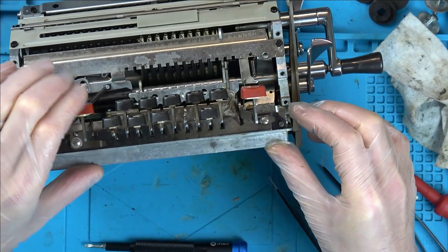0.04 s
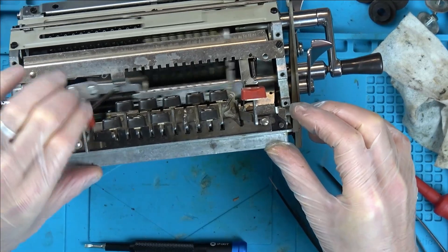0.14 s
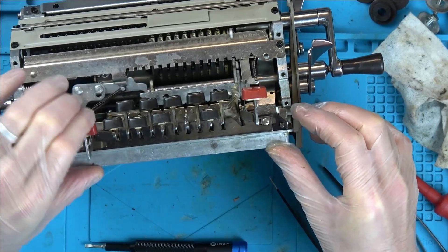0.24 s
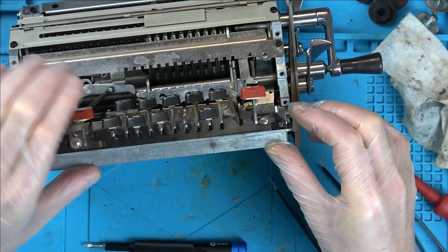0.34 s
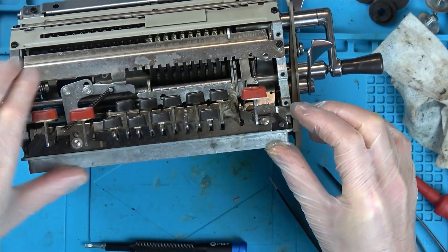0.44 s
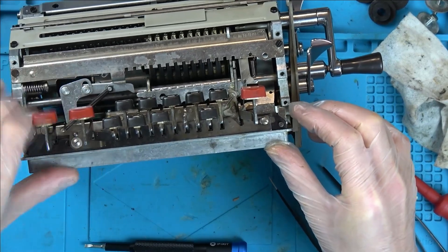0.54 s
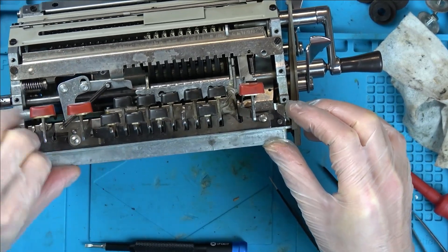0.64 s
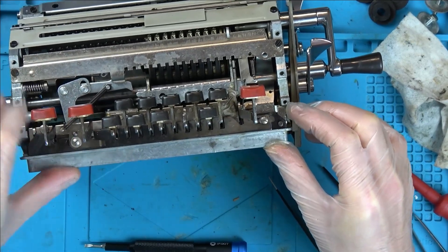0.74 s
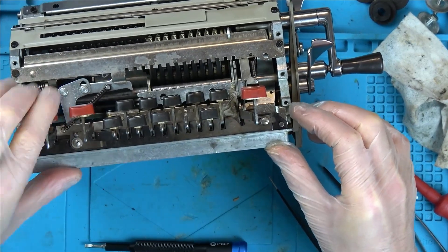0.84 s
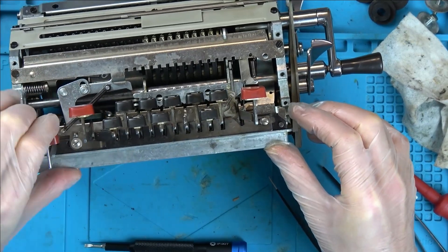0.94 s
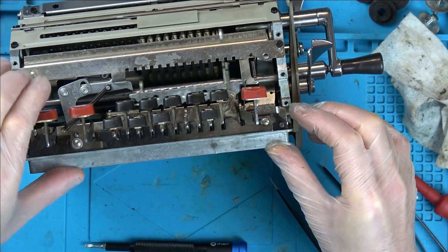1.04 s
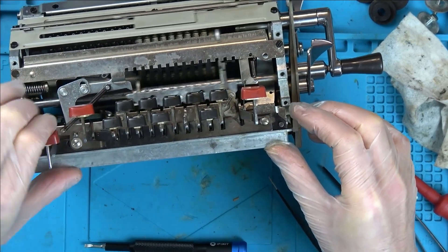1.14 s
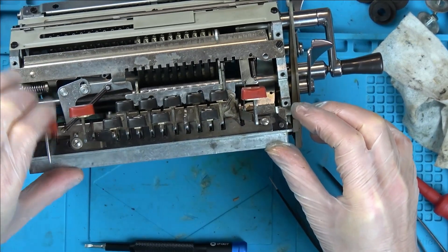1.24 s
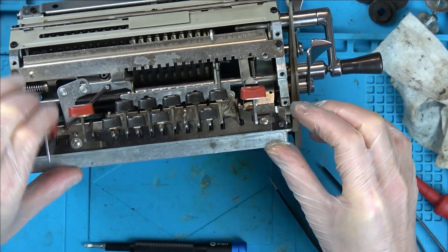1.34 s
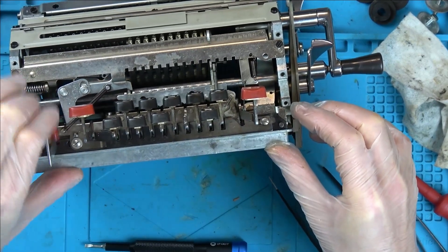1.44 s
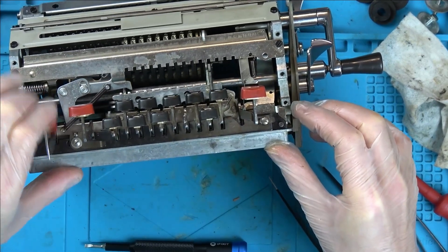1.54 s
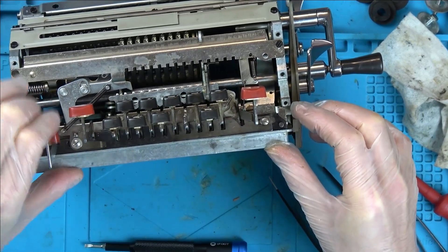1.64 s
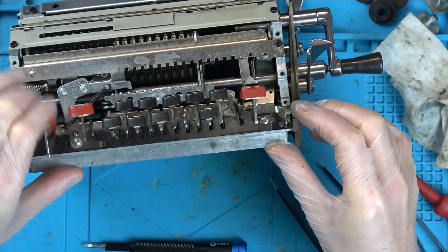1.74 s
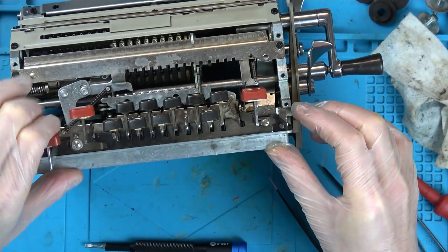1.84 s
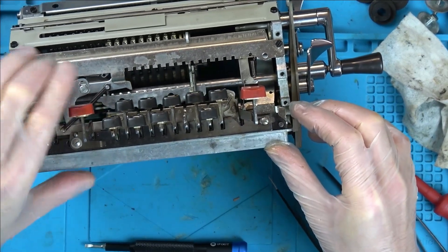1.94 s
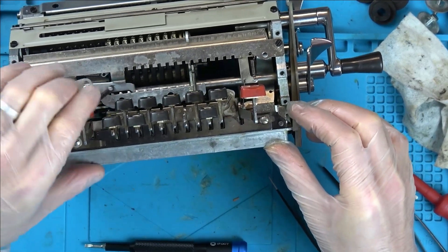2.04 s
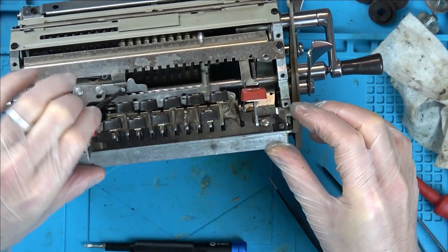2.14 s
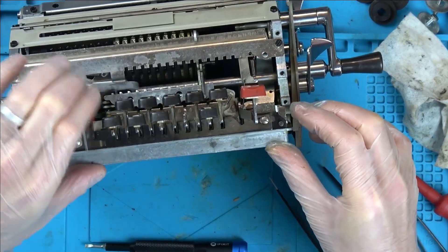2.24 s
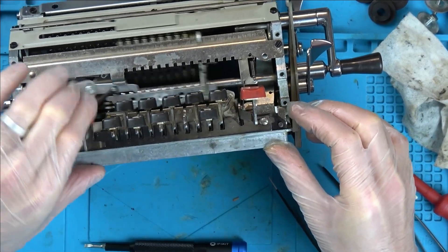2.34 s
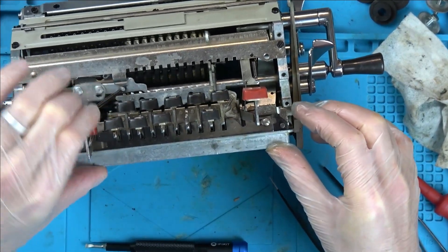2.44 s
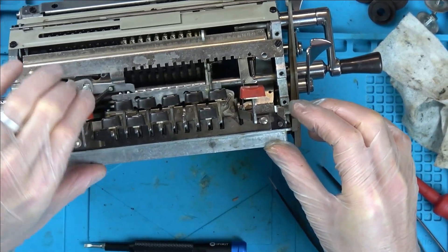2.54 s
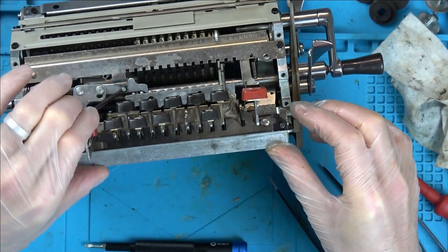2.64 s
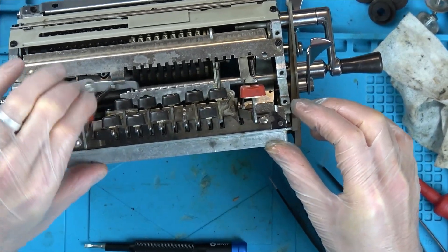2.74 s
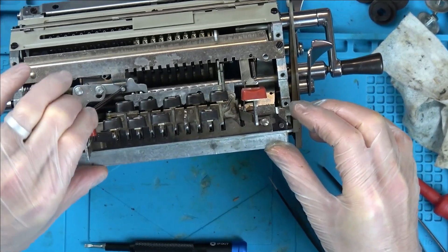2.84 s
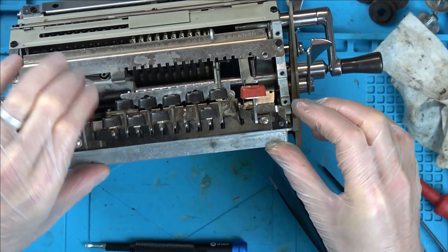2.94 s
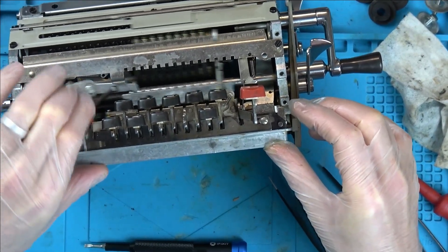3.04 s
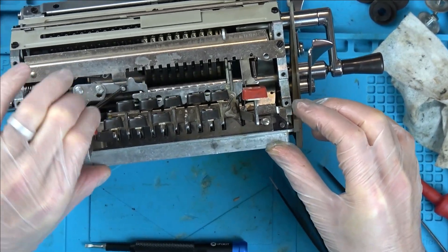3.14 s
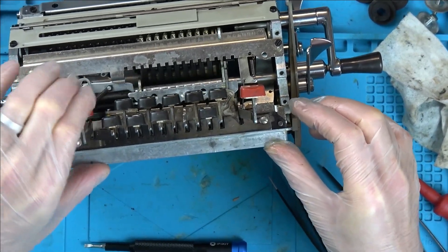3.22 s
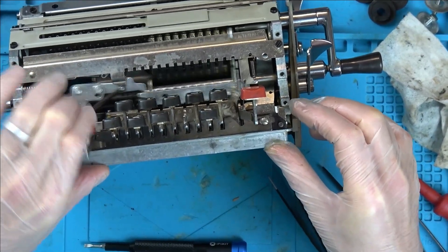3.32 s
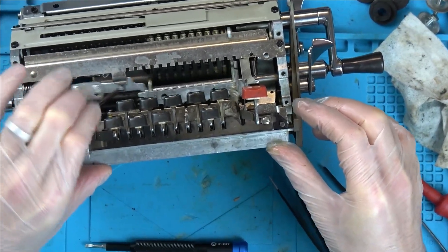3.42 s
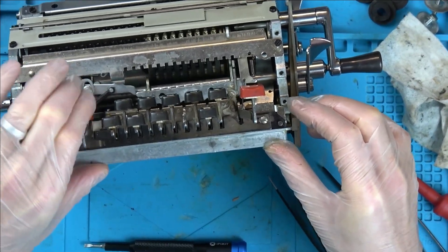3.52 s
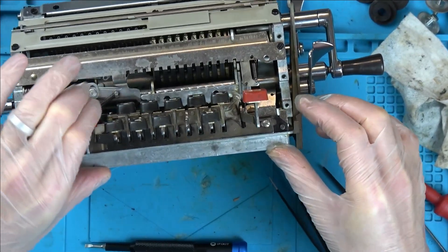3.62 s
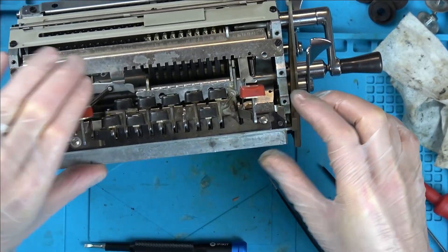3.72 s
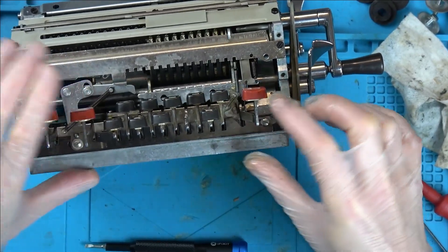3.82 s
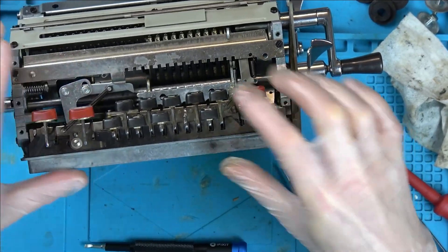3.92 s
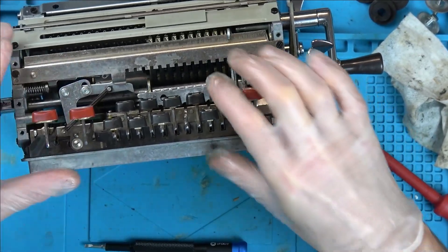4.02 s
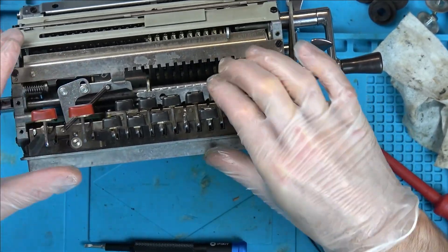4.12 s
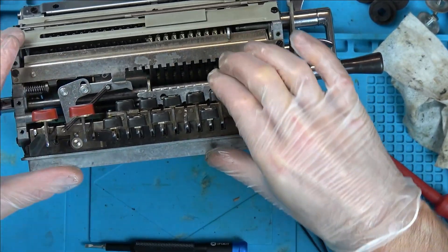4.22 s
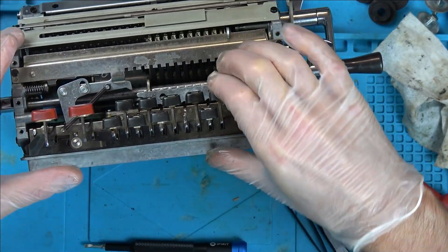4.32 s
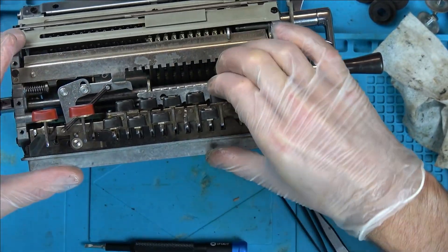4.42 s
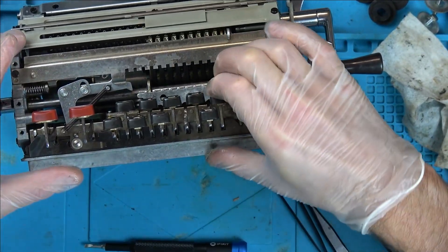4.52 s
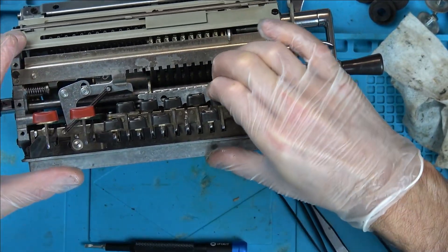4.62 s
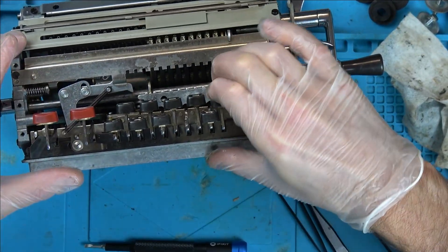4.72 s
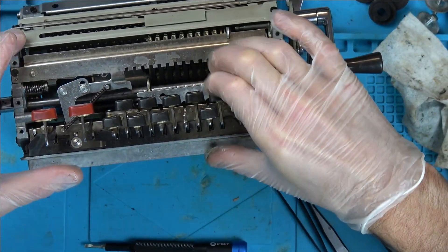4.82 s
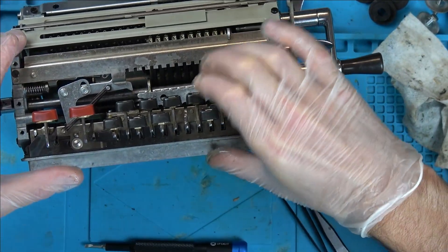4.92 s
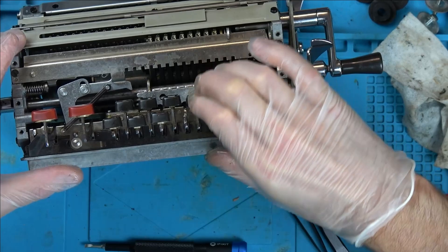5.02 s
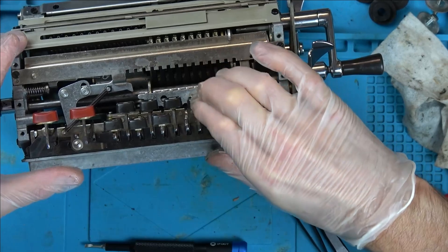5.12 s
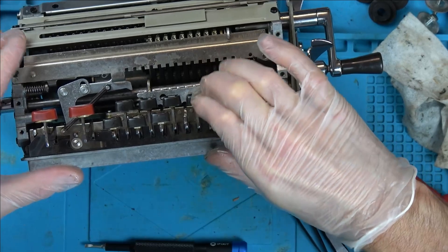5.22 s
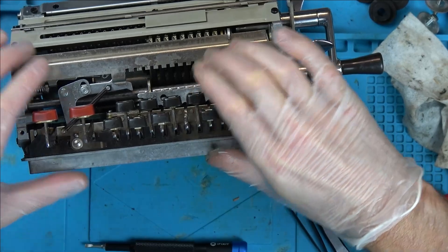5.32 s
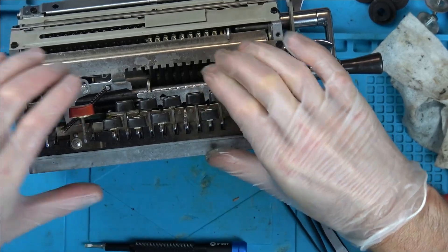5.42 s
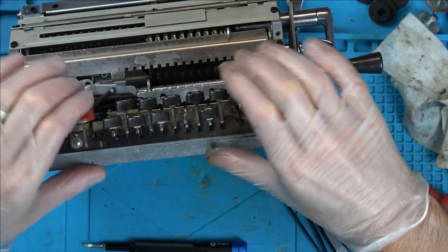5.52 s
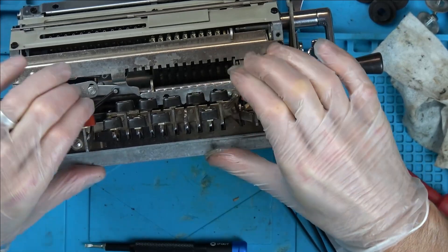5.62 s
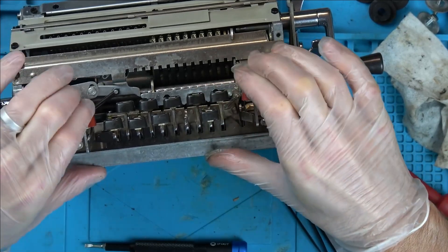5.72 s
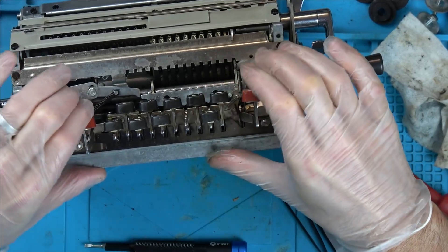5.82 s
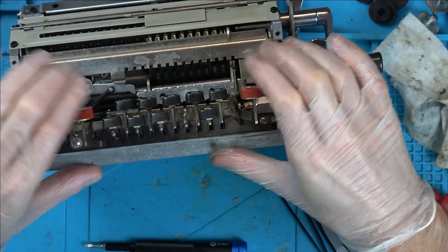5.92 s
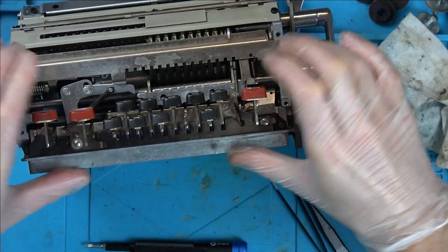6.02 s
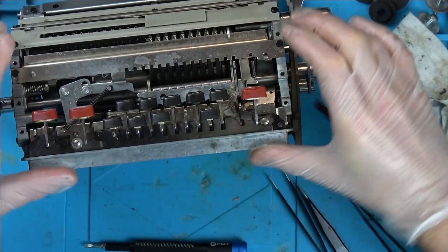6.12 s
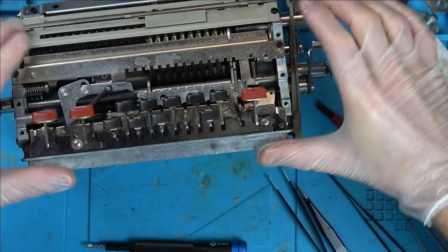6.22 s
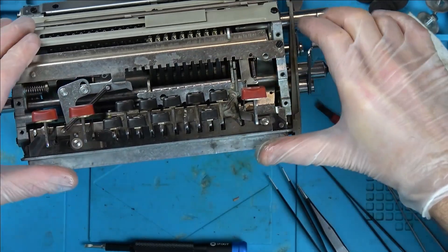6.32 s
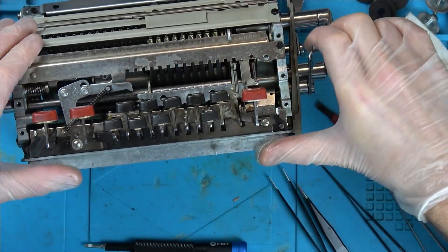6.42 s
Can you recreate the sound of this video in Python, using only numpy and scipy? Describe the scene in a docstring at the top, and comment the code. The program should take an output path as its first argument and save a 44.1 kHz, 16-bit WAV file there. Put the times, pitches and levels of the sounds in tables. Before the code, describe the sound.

A close, detailed take of an opened mechanical calculator handled on a bench mat in a still room with a very faint low hum. From 0 to 0.7 s levers clack and loose steel parts chatter, the hardest blow at about 0.25 s, with a tiny pivot squeak near 0.55. Between 1 and 2 s come ten quick steps, roughly nine a second, each a snap followed by a short rattling landing. From 2.1 to 3.8 s the carriage is pushed back: dense, uneven ratchet clicks, clacks and metal slides, bright with a thin springy ring, over dull bench thuds and low rocking rumble. From 3.9 to 4.9 s it is nearly quiet, with soft finger bumps and faint ticks. Small clicks at 4.9 to 5.4 s lead to firm clacks at 5.6, 5.7 and 5.95 s, then lighter clicks to the end, around 6.3 s.

```python
"""Two hands work an opened mechanical calculator on a bench mat, close by, over still air and a faint hum.
First levers clack and chatter; from 1 to 2 s the carriage takes ten steps, each a latch snap and a rattling
landing; until 3.8 s it is pushed back over its ratchet; soft touches and single clacks follow.
Shaped noise makes blows, chatter and slides; they excite decaying modes (frame, pawls, spring, casing), a wash
and bench thuds. Wandering low tones and noise rock the machine on its mat."""
import sys
import numpy as np
from scipy import signal
from scipy.io import wavfile

SR = 44100
rng = np.random.default_rng(int(sys.argv[2]) if len(sys.argv) > 2 else 0)


def master(y):
    """Save y as 16-bit WAV."""
    cut = np.clip(np.atleast_2d(y).T, -1, 1)
    pcm = np.round(cut * 32767)  # scale
    wavfile.write(sys.argv[1], SR, pcm.astype(np.int16))


N = 284886

# Still room: f/Hz, relative density/dB per Hz
AIR_SPECTRUM = [(20, 0), (65, -2), (110, -7.5), (200, -16), (330, -13), (560, -25.5), (2900, -36.5),
                (3800, -36), (13500, -43), (16000, -47)]
# Steady hum: f/Hz, rms level/dB
HUM_TONES = [(107.7, -53), (156.1, -67), (317.6, -75)]
AIR_LEVEL_DB, BAND_EDGE_HZ = -54, 15850

# Parts sliding along guides: t/s, hold end after t/s, level/dB
SLIDES = [(0.612, .03, -50), (0.778, 0.04, -55), (0.895, 0.037, -55.5), (2.17, 0.33, -46),
          (2.605, .5, -51.5), (3.11, 0.4, -49), (3.595, 0.32, -56), (5.284, 0.026, -52.5),
          (5.534, 0.16, -60.5), (6.055, 0.13, -56.5), (6.247, 0.11, -52.5)]
SLIDE_RISE_S, SLIDE_T60_S, HANDLING_FLOOR_DB = 0.015, 0.5, -70

# Steel on steel: f/Hz, relative density/dB per Hz
STEEL_SPECTRUM = [(150, -21), (500, -14), (900, -9), (1550, -10), (1950, -6), (2500, -5.5), (3300, 0),
                  (4000, 1.5), (5300, -10), (8000, -7), (9500, -10.5), (11000, -10), (13300, -9.5),
                  (15800, -15.5)]
# dull = tilt at 1.8-2.1 kHz, bright = tilt above 7 kHz
# Loose parts chattering: t/s, length/s, level/dB, dull/dB, thud offset/dB
RATTLES = [(.001, .025, -26, -1, -10.5), (0.224, 0.045, -31, -2, -15), (.26, 0.013, -24.5, 7, -15.5),
           (0.354, 0.031, -24.5, 1.5, -7), (0.6347, .006, -38.5, 3, 4.5), (0.645, 0.0056, -28, 6.5, -11),
           (2.186, 0.0086, -30, -5.5, -19), (2.227, 0.022, -21.5, 0.5, -14.5),
           (2.311, 0.033, -26.5, -1, -9), (2.48, 0.025, -31, -2, -6.5), (2.535, 0.014, -30, -5, -11),
           (2.563, 0.012, -29, 0, -7.5), (2.691, 0.055, -35, 6, -14), (2.79, 0.013, -24, 0.5, -11),
           (2.905, 0.016, -25.5, 1.5, -12.5), (3.016, 0.011, -22, 2, -11.5), (3.076, .007, -33, -7, -11),
           (3.131, 0.021, -37.5, 6, -14), (3.164, 0.016, -23, 1.5, -15.5), (3.266, 0.01, -22.5, -1, -10.5),
           (3.385, 0.017, -30, -1.5, -17), (3.423, 0.0042, -25, 7, -20), (3.525, 0.025, -24.5, 1, -7.5),
           (3.635, .008, -40.5, 5, 0.5), (3.762, 0.011, -26.5, 3, -9), (5.091, .02, -39.5, 3, -11),
           (5.706, 0.011, -33.5, 3, -15), (5.982, 0.016, -21.5, 1.5, -10.5), (6, .016, -33, -1, -8)]
# Levers and pawls hitting stops: t/s, level/dB, dull/dB, bright/dB
CLICKS = [(0.0156, -20.5, -6, 2), (0.162, -28.5, -12.5, -1), (0.1699, -28.5, -1.5, -10),
          (.2113, -31.5, 3, 2), (0.2558, -10.5, 7.5, 5), (0.3366, -30, 1.5, -7.5), (0.3602, -17.5, -7.5, 3),
          (0.3862, -25, 6, -1.5), (.6027, -40, 2, -14.5), (0.6413, -19.5, 1, -5), (.7061, -29.5, -11, -6),
          (0.9106, -39, 2.5, 3.5), (1.084, -36, 0, -5), (1.3237, -36, 6.5, -3), (1.5342, -34.5, 3.5, 1.5),
          (1.9572, -27.5, 0.5, -9.5), (2.131, -30, -11, -1.5), (2.1436, -29.5, -7, -13),
          (2.169, -30.5, -11, -0.5), (2.2066, -25.5, 1, 5.5), (2.2842, -27, -4.5, 2.5),
          (2.2986, -28, -6.5, -0.5), (2.34, -17.5, -8, 1.5), (2.3777, -33, -11, -3.5), (2.387, -26, -3, -9),
          (2.403, -35, -15, -4), (2.438, -29.5, 7, 4.5), (2.4445, -29.5, -6, -1), (2.4703, -30, -5.5, 7),
          (2.4759, -23.5, 5, 4.5), (2.5582, -20.5, 0, -6), (2.5749, -17.5, -2, 0.5),
          (2.609, -30.5, -4.5, -11.5), (2.6707, -30, 3, -5.5), (2.6765, -28.5, -4, 12),
          (2.703, -32, 8.5, 20), (2.721, -23.5, -4.5, 11), (2.7666, -31.5, 4, 7), (2.776, -28, -4.5, 4.5),
          (2.853, -20.5, -1.5, -6.5), (3.0318, -15, -7, 2), (3.084, -25.5, 1.5, -10.5),
          (3.1428, -26, -4, 0.5), (3.1908, -22.5, -6.5, 9), (3.2179, -31, -4, -5), (3.287, -17, -0.5, 1),
          (3.3062, -27, -9, 7), (3.3456, -27, -0.5, -9), (3.409, -25, -0.5, -1.5), (3.4166, -13.5, 8, 0),
          (3.4974, -31.5, -1, -3), (3.5207, -17, 0, 2), (3.5865, -29, -4, -11.5), (3.645, -17, 12.5, 0.5),
          (3.721, -15, -1, -3), (3.758, -20.5, 0.5, -4), (3.847, -39.5, 4, 1), (4.4562, -53.5, 8, -4),
          (4.4891, -49.5, 7, -11), (4.6756, -59, 15, -9), (4.9268, -36.5, 9, -6), (4.9376, -37.5, 1, -2),
          (5.104, -27, -1.5, -2.5), (5.3523, -29, 7.5, -2.5), (5.6114, -19.5, -6.5, -6.5),
          (5.68, -38.5, 10, 5), (5.692, -34, 9, -15), (5.7015, -14, 9.5, -0.5), (5.9522, -15, 1.5, -0.5),
          (6.129, -33, -2, 6.5), (6.155, -29.5, -6, -1.5), (6.2725, -32.5, -6, 4), (6.2797, -27, 14, 0)]
RATTLE_BRIGHT_DB, CLICK_THUD_DB, THUD_DB_PER_DULL_DB = 2, -24, 0.27

# Bench under a blow: f/Hz, relative density/dB per Hz
BENCH_SPECTRUM = [(35, -1), (70, 8.5), (110, -2), (140, 0.5), (185, -1.5), (230, -3.5), (280, -5.5),
                  (400, -9), (700, -23.5), (1500, -33.5)]
# Hollow casing on the bench: f/Hz, relative level/dB, t60/s
CASE_MODES = [(136.7, -30, 0.42), (181, -27.5, 0.16), (279.7, -26.5, 0.29), (341, -27.5, .12),
              (437, -31.5, 0.16), (540, -25, 0.072)]
# Frame plates: f/Hz, relative level/dB, t60/s
FRAME_MODES = [(982, -36, .09), (1880, -29, .03), (2060, -21.5, 0.066), (3860, -31, .3),
               (4070, -32.5, 0.51), (4400, -29.5, .06)]
# Ratchet pawls and wheels: f/Hz, relative level/dB, t60/s
PAWL_MODES = [(1950, -18, .06), (2790, -26, .07), (3280, -24, .06), (3372, -18, .16), (3430, -22, .06),
              (7080, -24, .045), (7770, -22, .035), (8205, -16, .07), (8250, -14, .11), (9170, -20, .05),
              (9374, -25, .3), (10200, -14, .005), (10340, -25, .05), (12064, -28, .12), (12450, -13, .005),
              (12690, -21, .05), (14060, -21, .08), (14800, -25, .05)]
# Spring, two close tones: f/Hz, relative level/dB, t60/s
SPRING_MODES = [(3197, -31, 2.5), (3225, -38, 2.2)]
# Share of the blows reaching the ratchet: t/s, gain/dB
RATCHET_GAIN = [(0, 1), (.7, -15.5), (1, 3), (2, -2), (2.6, -1.5), (3.55, -1), (3.7, -9.5), (5.7, -12.5),
                (6, -0.5), (6.2, -12)]
# Frame and room wash: f/Hz, relative level/dB
WASH_SPECTRUM = [(200, 0), (800, 5.5), (2000, 0.5), (3800, 0.5), (6000, 1), (10000, -9.5), (15000, -2)]
# Frame and room decay: f/Hz, t60/s
WASH_DECAY = [(200, 0.26), (800, 0.27), (2000, 0.23), (4000, 0.24), (8000, .22), (14000, .17)]

# Hands shoving the machine on its mat: t/s, level/dB
SHOVES = [(.03, -24.5), (.28, -25.5), (.4, -25.5), (.65, -30), (.87, -31), (1.53, -21.5), (2.28, -29.5),
          (2.59, -30), (2.76, -30.5), (2.92, -27.5), (3.06, -30), (3.3, -22), (3.53, -21.5), (3.83, -33.5),
          (4.67, -45), (4.9, -44.5), (5.12, -38), (5.57, -42), (5.72, -26.5), (6.02, -20.5), (6.3, -35.5)]
SHOVE_RISE_S, SHOVE_T60_S, STEP_ROCK_DB = 0.055, 0.76, -23
# Heaviest stops jolting the machine on the bench: t/s, level/dB
JOLTS = [(0.26, -29), (.645, -35), (3.419, -27), (3.648, -34), (3.76, -33), (5.703, -29), (5.985, -27.5),
         (6.28, -39.5)]
# Dry lever pivot squeaks, and at 4.297 s a glove rubbing: t/s, length/s, f/Hz, rms level/dB
SQUEAKS = [(0.555, 0.042, 1770, -53), (0.787, .07, 2230, -57), (4.297, 0.026, 1750, -63),
           (6.095, 0.029, 1850, -60)]
# Ticks from linkage play: start t/s, end t/s, rate/(1/s), mean level/dB
PLAY = [(.79, .94, 24, -47.5), (2.18, 2.62, 24, -34), (2.62, 3.619, 22, -38.5), (3.999, 4.6, 10, -57)]

# Carriage steps: t/s, snap level/dB, chatter level/dB, flight/s, landing level/dB,
# rebound after landing/s, rebound level/dB
STEPS = [(0.9754, -24.5, -23, .023, -20, 0.033, -27.5), (1.106, -16.5, -28.5, .028, -17.5, 0.034, -40),
         (1.219, -23, -24.5, .025, -19.5, 0.015, -29.5), (1.353, -21, -30, 0.028, -20.5, 0.018, -32),
         (1.4494, -21.5, -32, 0.02, -20, 0.029, -33), (1.5625, -18.5, -27.5, .032, -20, 0.02, -33),
         (1.6524, -21, -29.5, .024, -19.5, .025, -27.5), (1.7705, -16.5, -28.5, 0.035, -20.5, 0.026, -28),
         (1.852, -21, -22.5, .027, -19, 0.013, -30), (1.9785, -14, -29, .036, -23.5, 0.021, -27)]
SNAP_DULL_DB, SNAP_BRIGHT_DB, SNAP_THUD_DB = 1, 0, -17
LANDING_S, LANDING_DULL_DB, LANDING_BRIGHT_DB, LANDING_THUD_DB = 0.013, 0.5, 2, -10
CHATTER_DELAY_S, CHATTER_SHARE = 0.004, 0.48  # delay after the snap; length as share of the flight

# Fingers bumping the casing: t/s, relative level/dB
BUMPS = [(4.297, -53.5), (4.677, -49), (4.72, -58), (4.849, -52), (4.867, -51.5), (5.04, -58)]


def amp(db):
    """Decibels to gain."""
    return 10 ** (np.asarray(db) / 20)


def evened(x):
    """Scales to rms 1."""
    return x / np.sqrt(np.mean(x ** 2) + 1e-20)


def read(points, hz):
    """Interpolates a spectrum table on a log-frequency axis."""
    f, value = np.transpose(points)
    return np.interp(np.log(hz + 1), np.log(f + 1), value)


def add(mix, s, sound):
    """Mixes a sound in at time s, no earlier than zero."""
    part = mix[max(round(s * SR), 0):][:len(sound)]
    part += sound[:len(part)]


def coloured(x, points, size=4096):
    """Causal minimum-phase filter of unit energy with the given spectrum."""
    log_gain = np.log(amp(read(points, abs(np.fft.fftfreq(size, 1 / SR)))))
    taps = np.fft.ifft(np.exp(np.conj(signal.hilbert(log_gain)))).real[:size // 2]
    return signal.fftconvolve(x, taps / np.linalg.norm(taps))[:len(x)]


def gesture(db, rise_s, hold_s, t60_s):
    """Power envelope: linear amplitude rise, hold until hold_s, exponential decay."""
    t = np.arange(2 * SR) / SR
    decay = amp(db - 60 * np.maximum(t - hold_s, 0) / t60_s)
    return (np.minimum(t / rise_s, 1) * decay) ** 2


def room_tone():
    """Still air as coloured noise, plus steady hum tones."""
    t = np.arange(N) / SR
    hum = np.zeros(N)
    for hz, db in HUM_TONES:
        hum += amp(db) * evened(np.sin(2 * np.pi * (hz * t + rng.random())))
    air = evened(coloured(rng.standard_normal(N), AIR_SPECTRUM))
    return hum + amp(AIR_LEVEL_DB) * air


def sliding(catches_per_s=250, catch_db=15):
    """Steel slides on steel: a fine noise scrape with tiny random catches."""
    power = np.full(N, amp(HANDLING_FLOOR_DB) ** 2)
    for s, hold_s, db in SLIDES:
        add(power, s, gesture(db, SLIDE_RISE_S, hold_s, SLIDE_T60_S))
    catches = (rng.random(N) < catches_per_s / SR) * rng.standard_normal(N)
    friction = rng.standard_normal(N) + amp(catch_db) * catches
    scrape = coloured(friction, [(200, -2.5), (1000, -6.0), (1900, -1.5), (3800, 3.0),
                                 (5500, -3.5), (10000, -11), (16000, -9.5)])
    return np.sqrt(power) * evened(scrape)


def steel(force, length_s, dull_db, bright_db, low_share=0.52):
    """Colours contact force as steel, tilted by dull and bright; rms 1 over the contact."""
    hz = np.geomspace(100, 16000, num=200)
    tilt = read([(1000, low_share * dull_db), (1800, dull_db), (2100, dull_db),
                 (2800, 0.0035), (4600, 0.0059), (7000, bright_db)], hz)
    sound = coloured(force, np.column_stack([hz, read(STEEL_SPECTRUM, hz) + tilt]))
    return sound / np.sqrt(np.mean(sound[:round(length_s * SR)] ** 2))


def noise_swell(dull_db, bright_db, length_s=0.0024, level_db=-25):
    """Short noise swelling in just before a blow, coloured like the blow."""
    swell = np.linspace(0, 1, round(length_s * SR)) ** 0.5
    return amp(level_db) * steel(swell * rng.standard_normal(len(swell)), length_s, dull_db, bright_db)


def thud(rise_s=0.001, knock_t60_s=0.021, boom_db=-8, boom_t60_s=0.24):
    """Force through the feet into the bench: short knock, longer boom."""
    t = np.arange(12000) / SR
    decay = amp(-60 * t / knock_t60_s) + amp(boom_db - 60 * t / boom_t60_s)
    push = (1 - np.exp(-t / rise_s)) * decay * rng.standard_normal(len(t))
    return push / np.std(push[:SR // 30])


def rattle(length_s, dull_db, bright_db, contacts_per_s=1300, spread_db=4, contact_t60_s=0.009,
           settle_t60_s=0.048, rise_s=0.00079, parts=3):
    """Loose parts strike repeatedly, each with its own short noise ring, then settle."""
    t = np.arange(4096) / SR
    settling = amp(-60 * np.maximum(t - 0.73 * length_s, 0) / settle_t60_s)
    stroke = (1 - np.exp(-t / rise_s)) * settling
    contacts = 150
    place, size = rng.random(contacts), rng.standard_normal(contacts)
    sign = rng.choice([-1, 1], contacts)
    order = np.arange(contacts)
    at = ((order + place) / contacts_per_s * SR).astype(int).clip(0, len(t) - 1)
    strikes = np.zeros((parts, len(t)))
    strikes[order % parts, at] = sign * amp(spread_db * size) * stroke[at]
    rings = rng.standard_normal(strikes.shape) * amp(-60 * t / contact_t60_s)
    force = signal.fftconvolve(strikes, rings, axes=1).sum(0)[:len(t)]
    return steel(force, length_s, dull_db, bright_db)


def one_rattle(s, length_s, db, dull_db, bright_db, thud_db):
    """Loose parts chatter after a short noise swell: (t/s, swell, steel sound, thud)."""
    swell = amp(db) * noise_swell(dull_db, bright_db, length_s=0.006, level_db=-14.5)
    chatter = amp(db) * rattle(length_s, dull_db, bright_db)
    push = amp(db + thud_db + THUD_DB_PER_DULL_DB * dull_db) * thud()
    return s, swell, chatter, push


def click(db, dull_db, bright_db, rise_s=0.00027, t60_s=0.016, after_db=-17, after_t60_s=0.07,
          looseness=0.35):
    """Noise crack at unit level; a higher blow level db raises the linkage shiver after it."""
    t = np.arange(4096) / SR
    shiver_db = after_db + looseness * np.clip(db + 22.5, -10, 10)
    decay = amp(-60 * t / t60_s) + amp(shiver_db - 60 * t / after_t60_s)
    shape = (1 - np.exp(-t / rise_s)) * decay
    return steel(shape * rng.standard_normal(len(t)), 0.0033, dull_db, bright_db)


def one_click(s, db, dull_db, bright_db, thud_db):
    """A lever lands: (t/s, noise swell before it, steel sound, thud)."""
    swell = amp(db) * noise_swell(dull_db, bright_db)
    crack = amp(db) * click(db, dull_db, bright_db)
    push = amp(db + thud_db + THUD_DB_PER_DULL_DB * dull_db) * thud()
    return s, swell, crack, push


def ringing(blow, modes, level_db):
    """Blows excite a part's modes: decaying cosines of unit energy, weighted and summed."""
    t = np.arange(2 * SR) / SR
    ring = np.zeros(len(t))
    for hz, db, t60_s in modes:
        mode = amp(-60 * t / t60_s) * np.cos(2 * np.pi * hz * t)
        ring += amp(db) * mode / np.linalg.norm(mode)
    return amp(level_db) * signal.fftconvolve(blow, ring)[:N]


def tail(rise_s=0.0061):
    """Dense noise response of frame and room, decay time set per band."""
    hz, t, z = signal.stft(rng.standard_normal(SR // 2), SR, nperseg=256)
    decay_db = 60 * t / read(WASH_DECAY, hz)[:, None]
    gain = amp(read(WASH_SPECTRUM, hz)[:, None] - decay_db)
    sound = signal.istft(z * gain, SR, nperseg=256)[1]
    sound = sound * (1 - np.exp(-np.arange(len(sound)) / SR / rise_s))
    return sound / np.linalg.norm(sound)


def wash(metal, level_db=-14, count=4):
    """Several random noise tails crossfade in turn, cycling every 0.5 s, so the wash varies."""
    phase = np.arange(N) / SR * 2 * np.pi
    shares = [np.cos(phase + np.pi * k / count) ** 4 for k in range(count)]
    shares = shares / np.linalg.norm(shares, axis=0)
    return amp(level_db) * sum(signal.fftconvolve(metal * share, tail())[:N] for share in shares)


def rocking(hz=34.5, wander_hz=4, mush_db=-9):
    """Heavy machine swings on the mat after shoves and steps: wandering tone plus low noise."""
    power = np.zeros(N)
    landings = [(s + flight_s, STEP_ROCK_DB) for s, _, _, flight_s, _, _, _ in STEPS]
    for s, db in list(SHOVES) + landings:
        add(power, s, gesture(db, SHOVE_RISE_S, SHOVE_RISE_S, SHOVE_T60_S))
    drift = evened(coloured(rng.standard_normal(N), [(1, 0), (8, -0.5), (30, -40), (200, -90.5)],
                            size=32768))
    swing = evened(np.sin(2 * np.pi * np.cumsum(hz + wander_hz * drift) / SR))
    mush = evened(coloured(rng.standard_normal(N), [(8, -9), (22, 2.5), (42, 0.5), (65, -13),
                                                    (130, -32.0), (600, -76.5)], size=16384))
    return np.sqrt(power) * evened(swing + amp(mush_db) * mush)


def jolts(hz=82, t60_s=0.3, rise_s=0.0031):
    """Bench top booms briefly: a decaying sine per jolt."""
    t, out = np.arange(SR // 2) / SR, np.zeros(N)
    boom = (1 - np.exp(-t / rise_s)) * amp(-60 * t / t60_s) * np.sin(2 * np.pi * hz * t)
    for s, db in JOLTS:
        add(out, s, amp(db) * boom)
    return out


def squeaks(width=0.07):
    """A pivot or a glove sticks and slips: noise through one narrow resonance."""
    out = np.zeros(N)
    for s, length_s, hz, db in SQUEAKS:
        slips = rng.standard_normal(round(length_s * SR))
        note = coloured(slips, [(hz / 2, -35), (hz * (1 - width), -10), (hz, 0),
                                (hz * (1 + width), -10), (hz * 2, -35)])
        add(out, s, amp(db) * evened(note * signal.windows.tukey(len(note), 0.5)))
    return out


def faint_ticks(spread_db=3):
    """Linkage play: small clicks at loosely even, random moments and levels."""
    ticks = []
    for start, end, per_s, db in PLAY:
        count = max(round((end - start) * per_s), 1)
        for k, (place, size) in enumerate(rng.random((count, 2))):
            s = start + (end - start) * (k + place) / count
            tick_db = db + spread_db * (2 * size - 1)
            ticks.append(one_click(s, tick_db, dull_db=1.5, bright_db=-7, thud_db=-11))
    return ticks


def carriage_step(s, snap_db, chatter_db, flight_s, landing_db, rebound_s, rebound_db):
    """Latch snaps open; carriage chatters along, lands on the next tooth and rebounds."""
    landing = s + flight_s
    return [one_click(s, snap_db, SNAP_DULL_DB, SNAP_BRIGHT_DB, SNAP_THUD_DB),
            one_rattle(s + CHATTER_DELAY_S, CHATTER_SHARE * flight_s, chatter_db,
                       dull_db=-3, bright_db=-1, thud_db=-10.5),
            one_rattle(landing, LANDING_S, landing_db,
                       LANDING_DULL_DB, LANDING_BRIGHT_DB, LANDING_THUD_DB),
            one_rattle(landing + rebound_s, 0.01, rebound_db, dull_db=-3.5, bright_db=3, thud_db=-15)]


def blows():
    """All rattles, clicks, ticks and steps: summed steel sound and bench thuds."""
    events = [one_rattle(s, length_s, db, dull_db, RATTLE_BRIGHT_DB, thud_db)
              for s, length_s, db, dull_db, thud_db in RATTLES]
    events += [one_click(*row, CLICK_THUD_DB) for row in CLICKS]
    events += faint_ticks()
    for row in STEPS:
        events += carriage_step(*row)
    metal, bench = np.zeros(N), np.zeros(N)
    for s, swell, crack, push in events:
        add(metal, s - len(swell) / SR, swell)  # swell ends at contact
        add(metal, s, crack)
        add(bench, s, push)
    return metal, coloured(bench, BENCH_SPECTRUM)


def bumps(rise_s=0.0025, t60_s=0.15):
    """Soft, dull finger touches: decaying low-coloured noise."""
    t, out = np.arange(SR // 4) / SR, np.zeros(N)
    for s, db in BUMPS:
        push = (1 - np.exp(-t / rise_s)) * amp(-60 * t / t60_s) * rng.standard_normal(len(t))
        touch = coloured(push, [(80, -7), (250, 8), (550, 1), (900, -12.0),
                                (1700, -18), (4000, -35), (12000, -48)])
        add(out, s, amp(db) * touch)
    return out


def scene():
    """The machine on its bench: blows and slides drive the resonances; other layers add."""
    metal, bench = blows()
    metal = metal + sliding()
    ratchet_db = np.interp(np.arange(N) / SR, *np.transpose(RATCHET_GAIN))
    at_ratchet = metal * amp(ratchet_db)
    pawls = ringing(at_ratchet, PAWL_MODES, level_db=-4.5)
    spring = ringing(at_ratchet, SPRING_MODES, level_db=-2.5)
    frame = ringing(metal, FRAME_MODES, level_db=-10)
    knock = amp(-0.5) * bench + ringing(bench, CASE_MODES, level_db=-4)
    machine = metal + pawls + spring + frame + wash(metal) + knock
    handling = rocking() + jolts() + squeaks() + bumps()
    return (machine + handling + room_tone())[None]


def record(dry):
    """Full-scale clip, then linear-phase low-pass at the band edge."""
    taps = signal.firwin(301, BAND_EDGE_HZ, window=("kaiser", 8), fs=SR)
    return signal.oaconvolve(np.clip(dry, -1, 1), taps[None], "same")


dry = scene()
out = record(dry)
master(out)
```